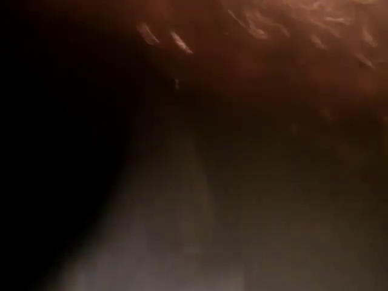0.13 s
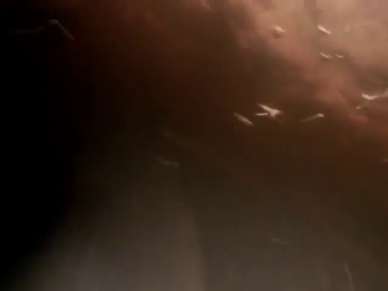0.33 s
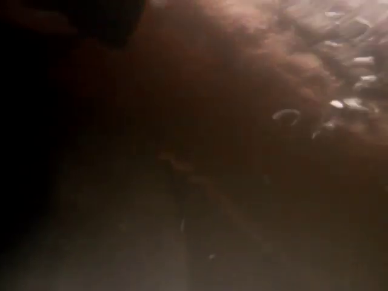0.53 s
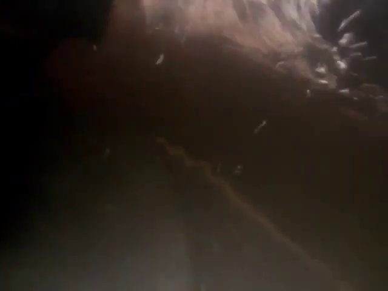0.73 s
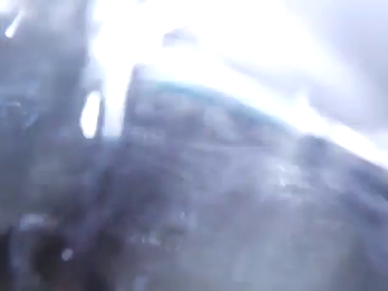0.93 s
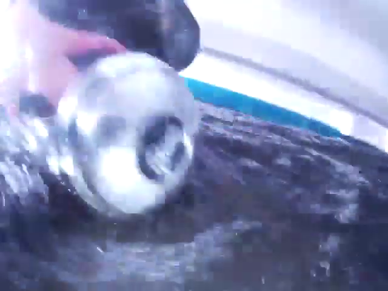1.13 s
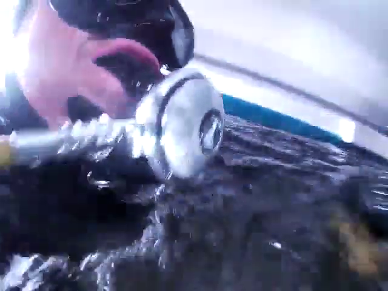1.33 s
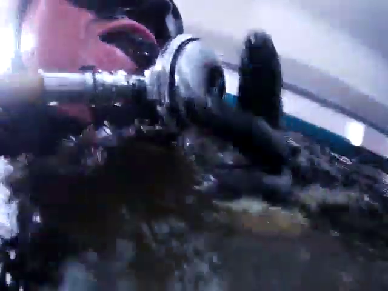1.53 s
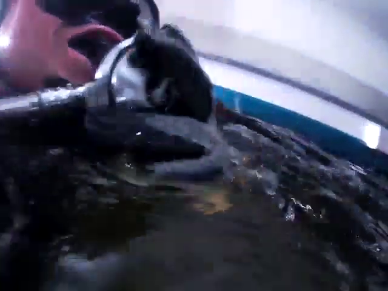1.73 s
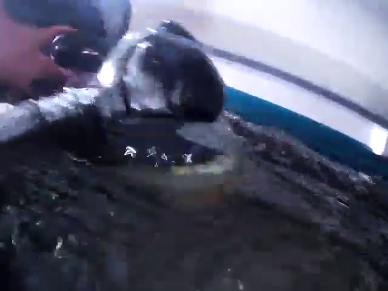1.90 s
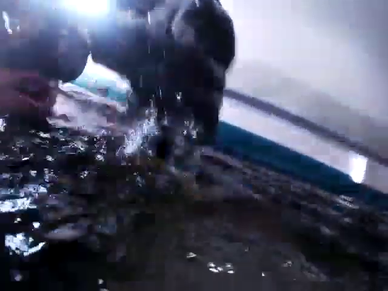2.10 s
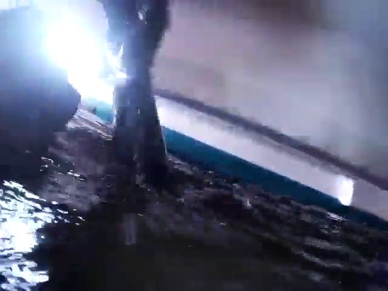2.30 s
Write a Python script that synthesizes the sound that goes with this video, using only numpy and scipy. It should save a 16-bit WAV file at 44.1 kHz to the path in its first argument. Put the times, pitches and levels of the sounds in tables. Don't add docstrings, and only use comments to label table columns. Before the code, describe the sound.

Heard from inside a sealed case in murky water: dull rushing and hollow bubbles, a brief lull at the surface, a cluster of sharp splashes and spray, then quiet dripping and a small final bump.

```python
import sys
import numpy as np
from scipy import signal
from scipy.fft import rfft, irfft, next_fast_len
from scipy.io import wavfile

SR = 44100
rng = np.random.default_rng(int(sys.argv[2]) if len(sys.argv) > 2 else 0)


def ratio_of_db(decibels):
    return 10 ** (np.asarray(decibels, float) / 20)


def generate_wav(signal):
    frames = np.transpose(np.atleast_2d(signal))
    scaled = np.clip(frames, -1, 1) * 32767
    pcm = np.round(scaled).astype(np.int16)
    wavfile.write(sys.argv[1], SR, pcm)


N = 108265
SURFACE_S = .9
CHURN_DB = 1.5

# time [s], gurgle level [dB], bubble pitch [Hz].
FLOW = [(0, -25, 613), (.2, -30, 603), (.29, -30, 580), (.34, -26, 657), (.43, -28, 625), (.47, -28, 623),
        (.52, -24, 562), (.68, -24.5, 635), (.76, -41, 663), (.87, -44, 730), (.96, -35, 619),
        (1.06, -39.5, 760), (1.2, -63.5, 659)]
# time [s], level [dB].
RUNOFF = [(0, -65), (.45, -66), (.55, -51), (.7, -46.5), (.85, -64), (.95, -48), (1.1, -47), (1.2, -51),
          (1.26, -42), (1.38, -30.5), (1.44, -37), (1.53, -33), (1.63, -44.5), (1.655, -26), (1.7, -38.5),
          (1.73, -38), (2.0, -47), (2.36, -50.5), (2.42, -46)]
# time [s], level [dB], share of thud [dB].
SWELL = [(0, -33.5, 12.5), (.08, -35, 11), (.2, -33.5, 6.5), (.45, -38, 4), (.63, -33, 4), (.78, -29.5, -8),
         (.87, -39, -1), (1.2, -46.5, -1), (1.34, -37, -2), (1.5, -44, 1), (2.2, -43, -10.5),
         (2.32, -44.5, -11), (2.45, -33, -20)]
# frequency [Hz], level [dB].
SLOSH_COLOUR = [(15, 7.5), (32, 2.5), (65, -9.5), (130, -22)]
# frequency [Hz], level [dB].
THUD_COLOUR = [(60, 3), (110, 1), (210, 1.5), (300, -11.5), (500, -31)]
# frequency [Hz], level [dB].
CASE_COLOUR = [(560, -16.5), (800, -9.5), (1080, -8.5), (1580, 2), (2300, -10), (3400, -22.5),
               (4000, -28.5), (4800, -27), (8000, -39), (13000, -52)]
# frequency [Hz], level [dB].
FIZZ_COLOUR = [(1200, 7.5), (2000, -9), (3300, -7), (4100, -21.5), (5000, -3.5), (9800, -8), (12500, -16)]
# frequency [Hz], level [dB], t60 [s].
THRUM = [
    (195, -16.5, 0.15),
    (110.6, -25, 0.091),
]
# time [s], pitch [Hz], level [dB].
GLUGS = [
    [(.2, 237, -40), (.27, 291.5, -30), (.37, 315, -36)],
    [(.31, 388, -23), (.39, 444, -26.5), (.46, 416, -38)],
    [(.47, 325, -26.5), (.52, 387, -31.5), (.6, 493, -43)],
    [(.03, 712, -45), (.13, 895, -37.5), (.16, 1080, -41.5)],
    [(.98, 823, -37), (1.02, 909, -41.5), (1.08, 950, -46)],
]
# time [s], peak [dB], pitch [Hz].
GULPS = [(0.054, -15.5, 665), (0.318, -11.5, 649.4), (0.331, -14, 674), (0.506, -17, 617),
         (0.529, -18.5, 726), (0.565, -14.5, 642), (0.598, -18, 692), (0.655, -19, 750), (0.943, -33, 550),
         (2.191, -47.5, 459), (.264, -28, 313), (.324, -34.5, 870), (.808, -34, 643), (.88, -40, 627),
         (1.012, -39.5, 916), (1.04, -42, 830)]
# start [s], peak [dB], pitch [Hz].
TICKS = [(.202, -43.5, 6300), (.351, -42.5, 7670), (.368, -49, 7200), (.409, -47, 8850), (.487, -50, 6900),
         (.5, -47, 5050), (.585, -51.5, 9360), (.637, -35, 7070), (.652, -39, 4890), (.705, -41, 5180),
         (1.276, -35.5, 5480), (1.328, -46, 7300), (1.349, -43, 11700), (1.424, -42, 5640),
         (1.46, -32.5, 5900), (1.513, -30, 6960), (1.55, -29, 4200), (1.649, -37.5, 5400),
         (1.733, -50, 8340), (2.011, -41, 5800), (2.024, -38.5, 5000), (2.397, -49, 9830),
         (2.424, -41, 4820), (.225, -54.5, 5900), (.243, -53, 9200), (.266, -48.5, 5160), (.298, -50, 4400),
         (.353, -53, 4430), (.39, -58, 8140), (.645, -51, 6200), (.663, -50, 5230), (.738, -49, 7000),
         (1.229, -39.5, 4500), (1.334, -41, 6700), (1.413, -52, 7250), (1.53, -43, 4600),
         (1.537, -45, 4600), (1.621, -49, 4900), (2.086, -48, 4570), (2.128, -45, 3830), (2.44, -47, 5040)]
# start [s], peak [dB], pitch [Hz].
PINGS = [(.299, -35, 1277), (.322, -34, 1624), (.49, -34, 1790), (.502, -33, 1380), (.513, -37, 1740),
         (1.276, -20, 3377), (1.461, -25.5, 2720), (1.568, -31, 2720), (1.938, -28.5, 2560),
         (2.085, -38, 2630), (.24, -44.5, 1750), (.258, -50, 2620), (.299, -38.5, 1930), (.3, -54, 3100),
         (.352, -52, 3020), (.353, -41, 1600), (.436, -41.5, 1500), (.646, -41.5, 2870), (.804, -60, 3510),
         (1.478, -38, 3520), (1.584, -41, 3270)]
# start [s], level [dB], t60 [s].
SPRAY = [(0.651, -52, 0.034), (0.805, -73, 0.027), (1.27, -48, 0.0082), (1.349, -46, 0.017),
         (1.423, -52, .015), (1.445, -42, .03), (1.506, -36, 0.011), (1.515, -33.5, 0.0099),
         (1.538, -46, .02), (1.613, -51, 0.056), (1.65, -53.5, 0.094), (1.734, -46.5, 0.056),
         (2.011, -51, 0.087), (2.175, -52, .02), (2.396, -53, .04), (2.423, -52.5, 0.14)]
# frequency [Hz], level [dB].
MIST_COLOUR = [(2500, -2.5), (5000, 5.5), (7000, -0.5), (10000, -4.5), (14000, -27.5)]
# start [s], peak [dB], pitch [Hz], t60 [s].
SLAPS = [(0.6537, -21.5, 1850, 0.07), (0.7019, -27, 1310, 0.069), (1.2471, -24.5, 1726, 0.05),
         (1.2748, -21.5, 1570, 0.01), (1.3184, -26.5, 1040, 0.038), (1.3518, -11, 1602, 0.058),
         (1.3704, -9, 1720, 0.0075), (1.3884, -17.5, 2080, 0.072), (1.3983, -11, 1535, 0.032),
         (1.4439, -28, 2210, 0.074), (1.4952, -24, 1305, 0.036), (1.5299, -28, 1095, 0.075),
         (1.5688, -16, 1232, 0.078), (1.6477, -15.5, 1520, 0.06), (1.6717, -18, 1830, 0.01),
         (1.6844, -25.5, 1647, 0.075), (1.9295, -30, 1453, 0.061), (2.39, -28.5, 1620, 0.0083),
         (2.3979, -26.5, 1830, 0.031), (2.4217, -32.5, 2095, 0.028), (1.228, -40, 1610, 0.041),
         (1.624, -28.5, 1450, 0.041), (1.737, -35, 1355, 0.064), (.772, -42, 1330, 0.069),
         (1.4, -13.5, 1244, 0.018),
]
# time [s], pitch [Hz], level [dB].
SEAL = [(.655, 7630, -60), (.69, 6960, -69), (.73, 7100, -72), (.785, 7800, -71), (.8, 9800, -96),
        (.815, 8700, -77), (.845, 7500, -65), (.885, 7320, -64.5), (.94, 7500, -72)]
# time [s], pitch [Hz], level [dB].
FILM = [
    (.87, 4530, -69.5),
    (1.09, 4600, -63.5),
]
# time [s], pitch [Hz], level [dB].
FILL = [
    (1.45, 514, -44.5),
    (1.52, 599, -41.5),
    (1.6, 827, -39.5),
]
# time [s], pitch [Hz], level [dB].
DRAIN = [
    (1.9, 1490, -58),
    (1.94, 1494, -46.5),
    (2.15, 1510, -39),
    (2.25, 1480, -45),
    (2.37, 1410, -61),
]
# start [s], peak [dB], pitch [Hz], t60 [s].
KNOCK = [
    (2.392, -26.5, 197, 0.025),
]


def evened(x):
    return x / np.sqrt(np.mean(x ** 2) + 1e-20)


def curve(table, col):
    table = np.array(table, float)
    return np.interp(np.arange(N) / SR, table[:, 0], table[:, col])


def colour(x, points):
    hz, db = np.transpose(points)
    size = next_fast_len(N + 8192)
    octave = np.log2(np.fft.rfftfreq(size, 1 / SR) + 1)
    below = np.maximum(np.log2(hz[0]) - octave, 0)
    above = np.maximum(octave - np.log2(hz[-1]), 0)
    gain = ratio_of_db(np.interp(octave, np.log2(hz), db) - 16.7 * (below + above))
    return irfft(rfft(x, size) * gain, size)[:N]


def resonate(x, hz, width_hz):
    turn = np.exp(2j * np.pi * np.cumsum(hz) / SR)
    r = np.exp(-np.pi * width_hz / SR)
    smooth = signal.lfilter([(1 - r) ** 2], [1, -2 * r, r * r], x / turn)
    return 2 * (turn * smooth).real


def wander(per_s):
    return evened(signal.lfilter(*signal.butter(2, per_s / SR * 2), rng.standard_normal(N)))


def drops(per_s, spread_db):
    chance, side, luck = rng.random((3, N))
    size = ratio_of_db(spread_db * np.minimum(-np.log(luck + 1e-9), 3.5))
    return (chance < per_s / SR) * np.sign(side - .5) * size


def bubble(hz, t60, rise_turns, glide):
    t = np.arange(int(t60 * SR) + 64) / SR
    shape = (1 - np.exp(-t * hz / rise_turns)) ** 2 * ratio_of_db(-60 * t / t60)
    return shape / shape.max() * np.sin(2 * np.pi * hz * t * (1 + glide * t / t60))


def struck(rows, rise_turns, glide, beat, apart, click_db):
    out = np.zeros(N + SR)
    luck = rng.random((len(rows), 2))
    for (s, db, hz, t60), (u, v) in zip(rows, luck):
        other_hz = hz * (1 + apart * (1 + u)) ** np.sign(v - .7)
        ring = bubble(hz, t60, rise_turns, glide) / (1 + 0.59 * beat)
        other = bubble(other_hz, 0.78 * t60, rise_turns, glide) * beat / (1 + 0.29 * beat)
        click = bubble(hz * 1.17, 4.2 / hz, 0.29, 0.014) * ratio_of_db(click_db)
        at = round(s * SR)
        for part in (ring, other, click):
            out[at:at + len(part)] += ratio_of_db(db) * part
    return out[:N]


def lasting(rows, t60):
    return [(*row, t60) for row in rows]


def swarm(per_s, spread_db, lo_hz, hi_hz, turns, count):
    total = np.zeros(N)
    for hz in np.geomspace(lo_hz, hi_hz, count):
        ring = bubble(hz, turns / hz, 1.94, 0.061)
        total += evened(signal.oaconvolve(drops(per_s / count, spread_db), ring)[:N])
    return evened(total)


def whistle(table, width_hz, flutter_db):
    t = np.arange(N) / SR
    on = np.clip(np.minimum(t - table[0][0], table[-1][0] - t) / 0.022, 0, 1)
    hz = curve(table, 1) * (1 + 0.026 * wander(57))
    tone = evened(resonate(rng.standard_normal(N), hz, width_hz))
    return on * ratio_of_db(curve(table, 2) + flutter_db * wander(29)) * tone


def gurgle():
    crowd = swarm(1100, 0.43, 265.4, 900, 24.8, count=18)
    near = evened(resonate(crowd, curve(FLOW, 2), 320))
    gone_db = -20 * np.maximum(np.arange(N) / SR - FLOW[-1][0], 0)
    level_db = curve(FLOW, 1) - 4.0 + gone_db + 0.47 * wander(23)
    return ratio_of_db(level_db) * evened(near + .9 * crowd)


def swell():
    low = evened(colour(rng.standard_normal(N) * ratio_of_db(0.87 * wander(1.8)), SLOSH_COLOUR))
    thud = evened(colour(rng.standard_normal(N) * ratio_of_db(2.4 * wander(38)), THUD_COLOUR))
    return ratio_of_db(curve(SWELL, 1) + 4.5) * (low + ratio_of_db(curve(SWELL, 2) - 5.5) * thud)


def fizz():
    grains = swarm(460, 3.8, 1192, 8700, 31, count=20)
    submerged = np.arange(N) < SURFACE_S * SR
    return ratio_of_db(-66) * evened(colour(rng.standard_normal(N) + 0.98 * grains * submerged, FIZZ_COLOUR))


def thrum():
    t = np.arange(N) / SR
    return sum(ratio_of_db(db - 60 * (t / t60) ** 2) * np.sin(2 * np.pi * hz * t + 1.43)
               for hz, db, t60 in THRUM)


def runoff():
    under = np.clip((SURFACE_S - np.arange(N) / SR) / .06, 0, 1)
    level_db = curve(RUNOFF, 1)
    grains = swarm(1500, 5.7, 678.0, 9360, 20, count=22)
    wash = evened(colour(rng.standard_normal(N), CASE_COLOUR))
    tilted = [(hz, db + 0.3 * np.log2(hz / 1500)) for hz, db in CASE_COLOUR]
    body = evened(colour(grains, tilted)) + 0.89 * wash
    low = signal.sosfilt(signal.butter(4, 2400, fs=SR, output="sos"), body)
    high = signal.sosfilt(signal.butter(2, 2400, "high", fs=SR, output="sos"), body)
    beads = swarm(240, 3.8, 1116, 1875, 94, count=10)
    treble = ratio_of_db(0.15 * (level_db + 72) - 18 * under)
    mix = (1 - 0.6 * under) * low + 2.07 * under * beads + treble * high
    return ratio_of_db(level_db + CHURN_DB * wander(6)) * mix


def glugs():
    return sum(whistle(neck, 52, 1.5) for neck in GLUGS)


def gulps():
    early = GULPS - np.array([.003, 0, 0])
    return struck(lasting(early, 0.05), 1.8, 0.041, 0.25, 0.14, -18.5)


def ticks():
    return struck(lasting(TICKS, 0.0089), 4.0, 0.029, 0.53, 0.057, -32.0)


def pings():
    return struck(lasting(PINGS, 0.034), 0.61, 0.011, 0.48, 0.1, -21.5)


def spray():
    t = np.arange(N) / SR
    level = sum((t >= s) * ratio_of_db(db - 60 * np.maximum(t - s, 0) / t60) for s, db, t60 in SPRAY)
    return level * evened(colour(rng.standard_normal(N), MIST_COLOUR))


def slaps():
    return struck(SLAPS, 0.92, 0.0032, 0.19, 0.1046, click_db=-3)


def wet(x):
    t = np.arange(4000) / SR
    tail = rng.standard_normal(4000) * ratio_of_db(-60 * t / 0.025) * (t > .002)
    return x + ratio_of_db(-14) * signal.oaconvolve(x, tail / np.linalg.norm(tail))[:N]


def seal():
    return whistle(SEAL, 480, 3.2)


def film():
    return whistle(FILM, 1050, CHURN_DB)


def fill():
    return whistle(FILL, 78, 3.2)


def drain():
    return whistle(DRAIN, 230, 1.5)


def knock():
    return struck(KNOCK, 0.73, 0.012, 0.1, 0.08, -45)


def scene():
    water = gurgle() + swell() + fizz() + runoff() + spray()
    air = glugs() + gulps() + ticks() + seal() + film() + fill() + drain()
    case = thrum() + wet(pings() + slaps()) + knock()
    return (water + air + case)[None]


def roll_off(x):
    return signal.sosfilt(signal.butter(12, 14900, fs=SR, output="sos"), x)


def record(dry):
    dull = signal.sosfilt(signal.butter(4, 11500, fs=SR, output="sos"), dry)
    return roll_off(dull)


dry = scene()
out = record(dry)
generate_wav(out)
```